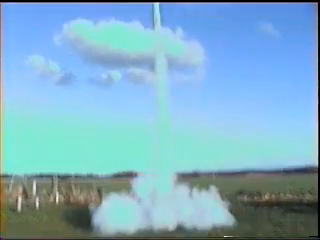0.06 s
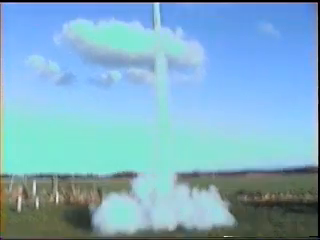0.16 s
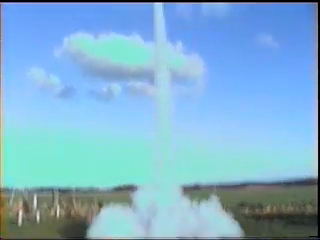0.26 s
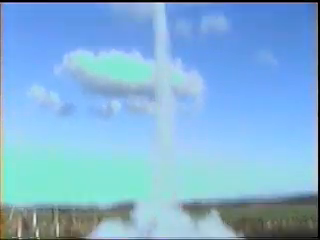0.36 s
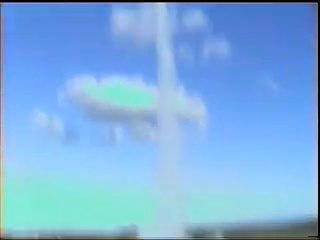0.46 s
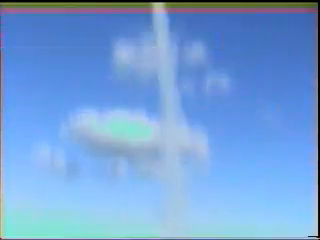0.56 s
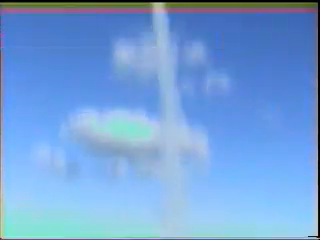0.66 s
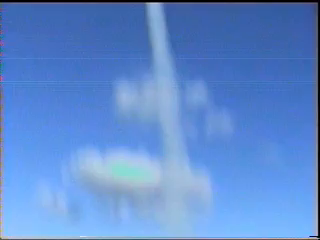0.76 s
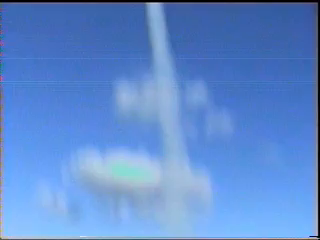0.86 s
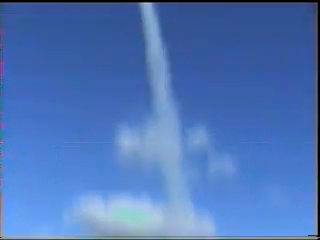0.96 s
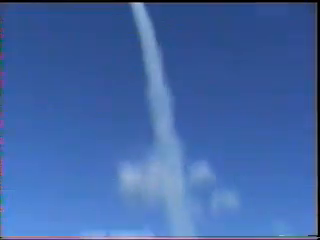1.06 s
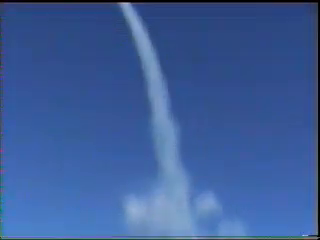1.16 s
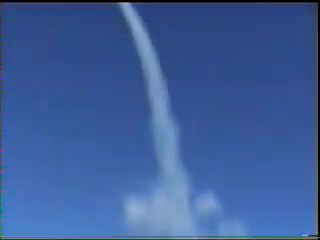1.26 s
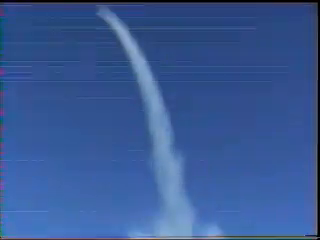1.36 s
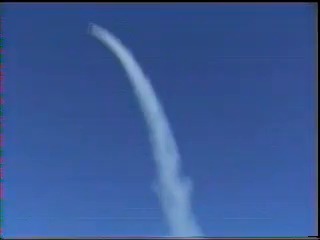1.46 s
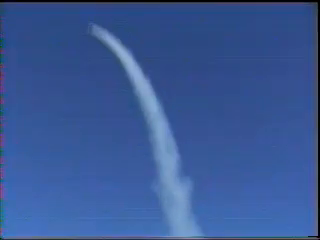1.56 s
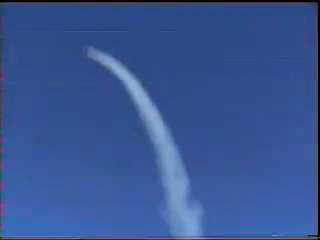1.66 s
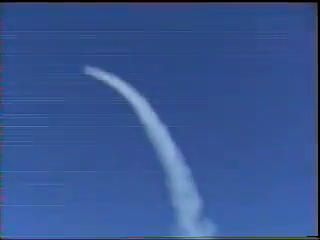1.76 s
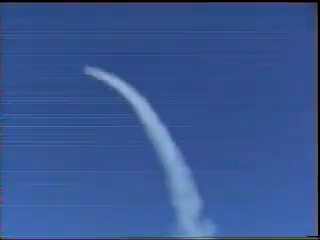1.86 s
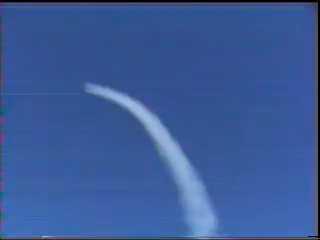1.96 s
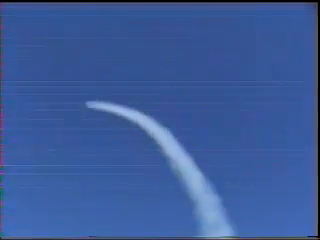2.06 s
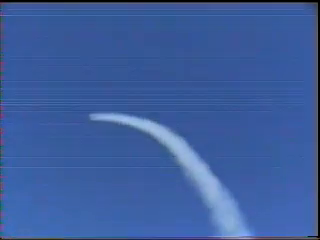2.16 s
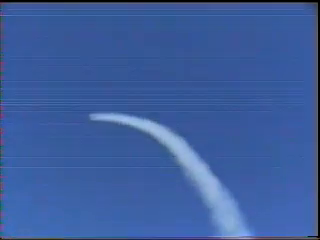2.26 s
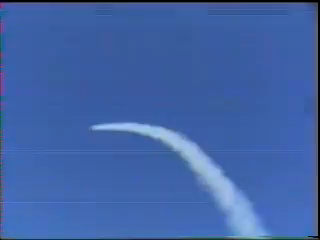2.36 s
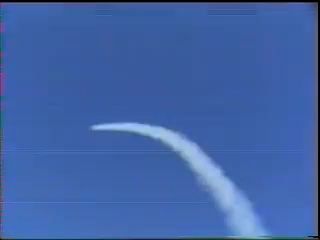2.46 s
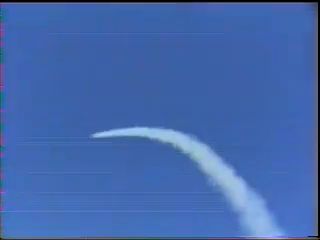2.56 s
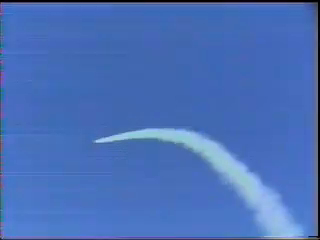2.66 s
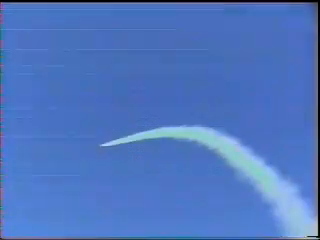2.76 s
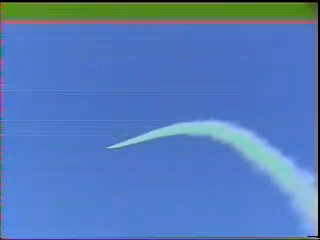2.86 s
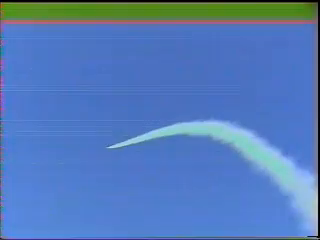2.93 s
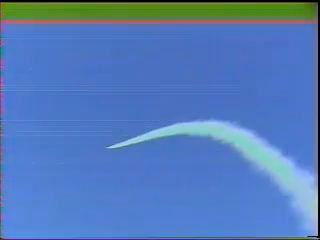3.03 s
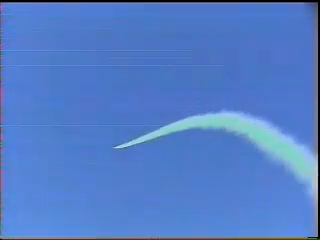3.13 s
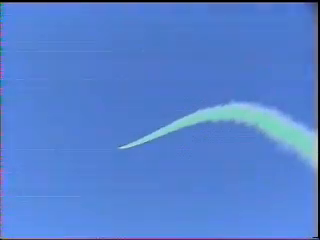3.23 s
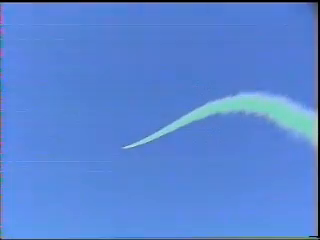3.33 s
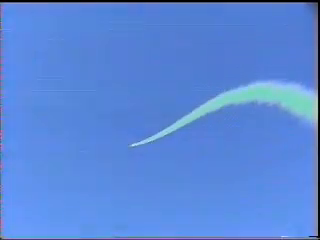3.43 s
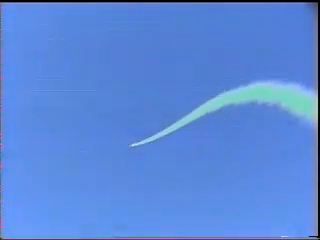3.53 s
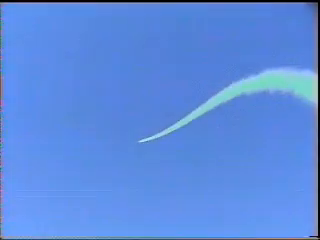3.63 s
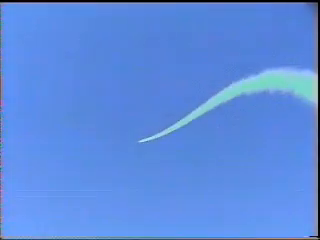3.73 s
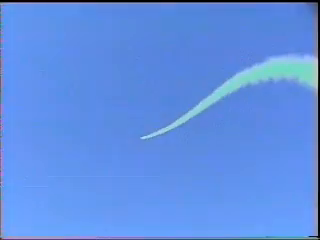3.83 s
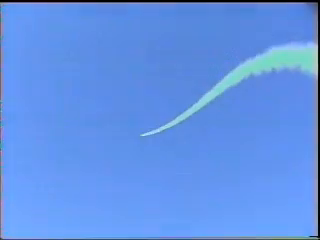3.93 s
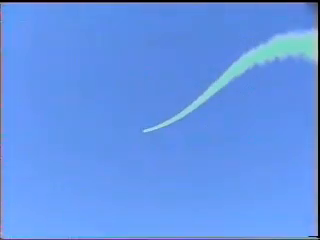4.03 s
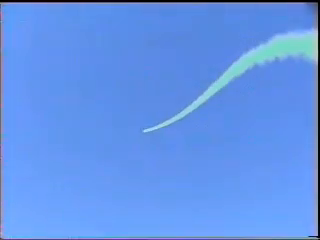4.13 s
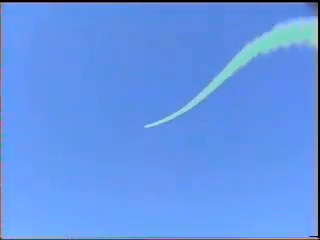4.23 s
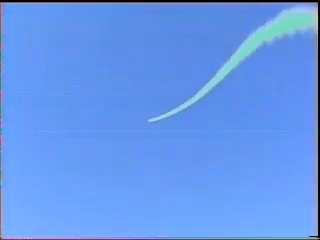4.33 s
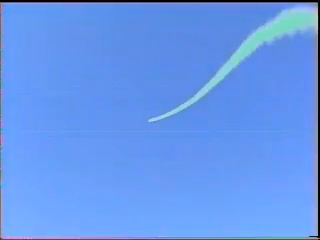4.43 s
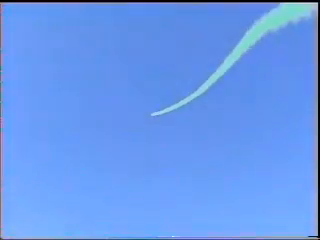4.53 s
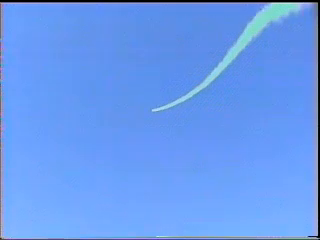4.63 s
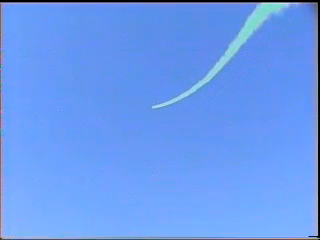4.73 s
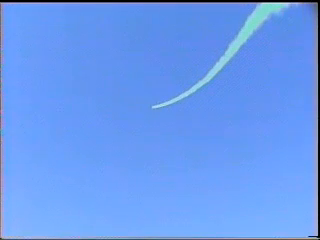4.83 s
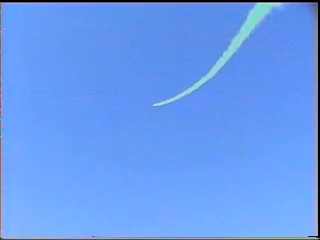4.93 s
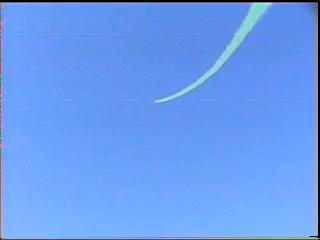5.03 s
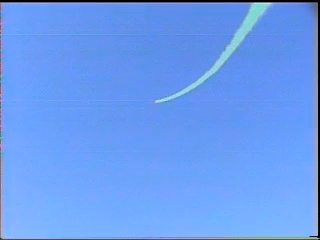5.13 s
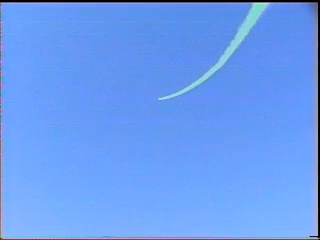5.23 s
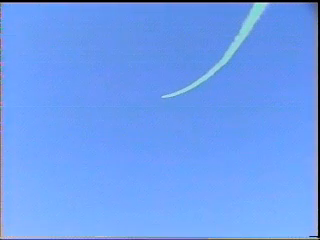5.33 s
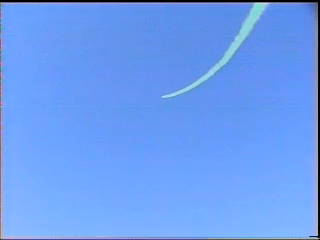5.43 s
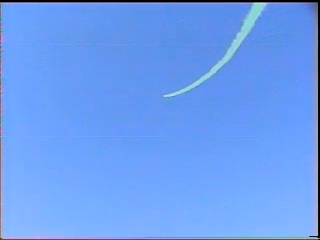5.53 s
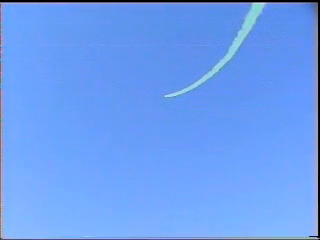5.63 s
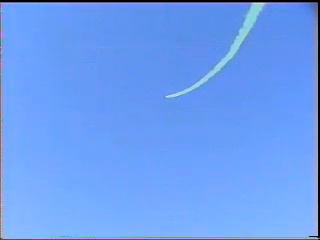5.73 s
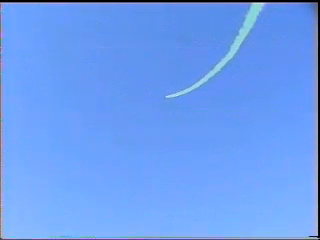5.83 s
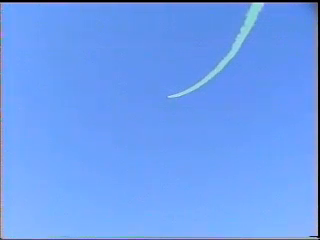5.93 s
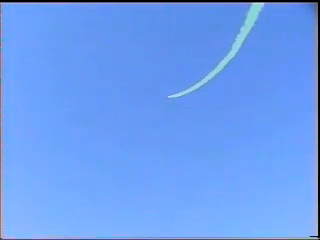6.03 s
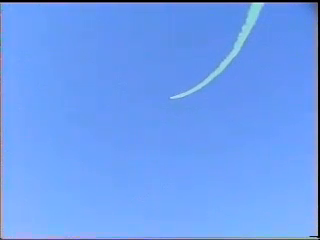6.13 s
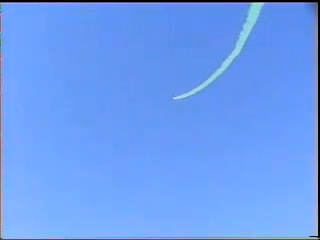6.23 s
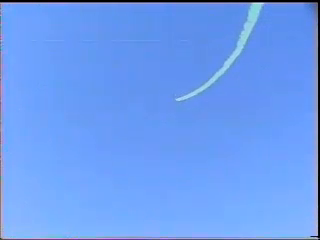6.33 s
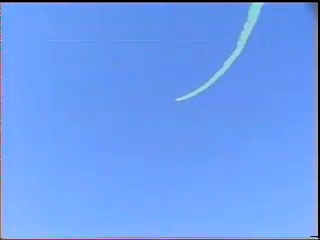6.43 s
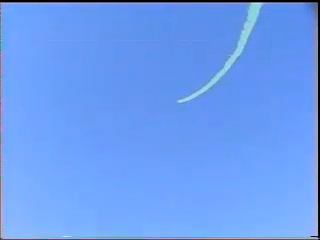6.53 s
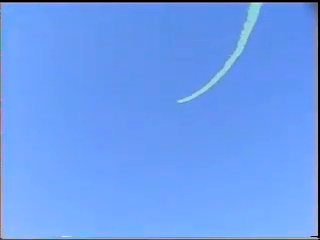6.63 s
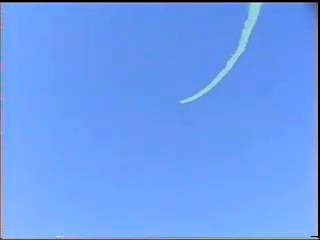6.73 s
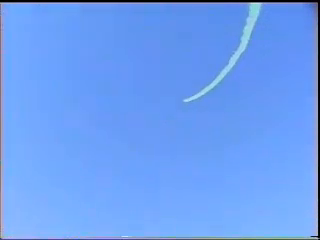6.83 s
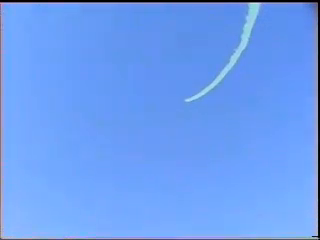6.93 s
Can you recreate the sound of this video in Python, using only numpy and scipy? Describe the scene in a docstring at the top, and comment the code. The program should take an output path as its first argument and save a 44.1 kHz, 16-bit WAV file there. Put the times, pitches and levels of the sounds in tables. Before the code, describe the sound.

Already at full force, a model rocket's jet roars over an open field, harsh and clipped, with surging low rumble beneath. It quickly eases into a steady, breathy rush that gets quieter and duller as the rocket climbs. A short, dull bang arrives from far off near the end, then the sound cuts dead. Gritty handheld camcorder sound, almost entirely in the left channel.

```python
"""An open field: a rocket motor's jet roars away, duller as it climbs, and ends in a dull far bang.
The jet is noise coloured by distance, the rumble is surging low noise, the bang a few pressure swings.
The grass and the hand-held camcorder's own body each return an echo to the microphone. The recorder
overloads, samples coarsely without smoothing and feeds the left channel; a faint copy leaks to the right."""
import sys
import numpy as np
from scipy import signal
from scipy.fft import rfft, irfft
from scipy.io import wavfile
from scipy.ndimage import uniform_filter1d, map_coordinates

SR = 44100
rng = np.random.default_rng(int(sys.argv[2]) if len(sys.argv) > 2 else 0)


def wav_record(signal):
    """Record a signal, one row per channel, as 16-bit PCM in the file named by sys.argv[1]."""
    frames = np.transpose(np.atleast_2d(signal))
    bounded = np.clip(frames, -1, 1)
    # unit amplitude maps onto the largest positive 16-bit level
    quanta = np.round(bounded * 32767).astype(np.int16)
    wavfile.write(sys.argv[1], SR, quanta)


N = 308011
T = np.arange(N) / SR  # s


def undb(db):
    """Amplitude factor of a level in dB."""
    return 10 ** (np.asarray(db) / 20)


def curves(table, t=T):
    """Columns of a (start_s, value, ..) table, read along straight lines at times t."""
    start_s, *columns = np.transpose(table)
    return [np.interp(t, start_s, column) for column in columns]


def colour(table, hz):
    """Level in dB of a (pitch_hz, level_db) table, read on a log-frequency axis."""
    pitch_hz, level_db = np.transpose(table)
    return np.interp(np.log(hz + 1), np.log(pitch_hz), level_db)


def butter(x, hz, kind="low", order=2):
    """Butterworth filter."""
    return signal.sosfilt(signal.butter(order, hz, kind, fs=SR, output="sos"), x)


def butter_in_phase(x, hz, kind="low", order=2):
    """Butterworth filter run forwards and backwards, so no frequency is delayed."""
    return signal.sosfiltfilt(signal.butter(order, hz, kind, fs=SR, output="sos"), x)


def delay(x, ms):
    """Sound that arrives later by a fixed or moving time, read between samples."""
    return map_coordinates(x, [np.arange(N) - ms * SR / 1000], order=3)


def patches(shape, wide, long):
    """Smooth random field over frequency and time, spread 1."""
    field = rng.standard_normal(shape)
    for _ in range(2):
        field = uniform_filter1d(field, wide, axis=0)
        field = uniform_filter1d(field, long, axis=1)
    return field / field.std()


def tone(hz, db):
    """Steady sine at a given rms level."""
    return np.sqrt(2) * undb(db) * np.sin(2 * np.pi * hz * T)


FLIGHT_S, DISTANCE_POWER = 6.4, 2.87


def distance(t=T):
    """Share of the flight's full distance; the rocket gains speed, so it grows as a power of time."""
    return (t / FLIGHT_S) ** DISTANCE_POWER


LIFTOFF_S = 0.52  # how fast the near-pad roar goes


def near_pad(t=T):
    """Nearness to the pad: 1 at the start, then a bell-shaped fall."""
    return np.exp(-(t / LIFTOFF_S) ** 2)


NOZZLE_HZ, NOZZLE_START_HZ, NOZZLE_TURN_S = 2450, 2070, 0.96  # settled pitch, first pitch, drift time
NOZZLE_WIDTH_HZ = 450
# How far the nozzle band stands out of the roar: start_s, lift_db
NOZZLE_LIFT = [(0, 2.5), (1, 3.5), (1.8, 2), (3, 6), (3.7, 2), (6.4, 5.5)]


def nozzle_band(hz, t):
    """Lift in dB of the jet's strong band, whose centre drifts upward early in the flight."""
    centre_hz = NOZZLE_HZ + (NOZZLE_START_HZ - NOZZLE_HZ) * np.exp(-t / NOZZLE_TURN_S)
    lift_db = curves(NOZZLE_LIFT, t)[0]
    return lift_db * np.exp(-((hz[:, None] - centre_hz) / NOZZLE_WIDTH_HZ) ** 2)


JET_DB, JET_FADE_DB = -18, 16.5  # base level; loss over the flight
LIFTOFF_DB, LIFTOFF_DB_PER_KHZ = 5, 1.5  # near the pad the roar is louder and brighter
TILT_DB_PER_KHZ, AIR_DB_PER_KHZ = 0.65, 10.5  # treble lift at no distance; air loss over the flight
JET_LOW_HZ = 99
# Relative colour of the jet through the microphone, per Hz of band: pitch_hz, level_db
JET = [(80, -15), (160, -12.5), (300, -7.5), (450, -4.5), (700, -4.5), (1000, -1), (1600, -1.5),
       (2300, -2.5), (2800, -3), (3200, -8.5), (3600, -15.5), (4500, -19.5), (5300, -27.5), (6200, -71)]


def jet(gust_db=0.51, eddy_db=0.36):
    """Turbulent noise; the air takes treble with distance and moving eddies make the bands waver."""
    hz, t, spectrum = signal.stft(rng.standard_normal(N), SR, nperseg=512, noverlap=384)
    tilt_db = TILT_DB_PER_KHZ - AIR_DB_PER_KHZ * distance(t) + LIFTOFF_DB_PER_KHZ * near_pad(t)
    db = colour(JET, hz)[:, None] + np.outer(hz / 1000, tilt_db)
    db = db + nozzle_band(hz, t)
    # equal power at every moment: loudness is set separately below
    gain = undb(db) / np.sqrt(np.mean(undb(2 * db), axis=0))
    gusts = patches(spectrum.shape, 40, 25)
    eddies = patches(spectrum.shape, 6, 12)
    gain = gain * undb(gust_db * gusts + eddy_db * eddies)
    roar = signal.istft(spectrum * gain, SR, nperseg=512, noverlap=384)[1][:N]
    level_db = JET_DB - JET_FADE_DB * distance() + LIFTOFF_DB * near_pad()
    return butter(roar, JET_LOW_HZ, "high", order=3) * undb(level_db)


RUMBLE_TOP_HZ, RUMBLE_SURGE_DB, RUMBLE_SURGE_S = 222, 2.2, .1
# Deep rumble of the plume, then low wind near the end, level around which it surges: start_s, level_db
RUMBLE = [(0, -23.5), (.6, -30), (1.8, -32.5), (3.2, -36), (4.2, -45.5), (5.2, -59.5), (5.8, -54.5),
          (6.3, -50)]


def rumble():
    """The big slow eddies of the plume come in surges, strongest while the rocket is near; low wind takes over
    at the end."""
    deep = butter(rng.standard_normal(N), RUMBLE_TOP_HZ, order=1)
    surge = patches((1, N), 1, int(RUMBLE_SURGE_S * SR))[0]
    level_db = curves(RUMBLE)[0] + RUMBLE_SURGE_DB * surge
    return deep / deep.std() * undb(level_db)


BANG_LOW_HZ = 97.6
BANG_TAIL_DB, BANG_TAIL_HZ, BANG_TAIL_S = -33.5, 900, 0.038  # scattered echoes of the bang
# Pressure swings of the far bang, before the microphone's bass loss:
# start_s (middle of the swing), pitch_hz, level_db (scale of the swing), length_cycles
BANG = [(6.3658, 650, -12, 0.23), (6.3720, 163, -9, 0.54), (6.3815, 404, -19.5, 0.73), (6.412, 256, -25, 1)]


def bang(glide=.7, late=.15):
    """Each swing is a slow dip in pressure followed by a quicker, higher rise; scattered echoes trail."""
    out = np.zeros(N)
    for start_s, pitch_hz, level_db, length_cycles in BANG:
        turn = pitch_hz * (T - start_s)
        swing = np.sin(2 * np.pi * turn * (1 + glide * np.clip(turn, -.5, 1)))
        out += undb(level_db) * swing * np.exp(-((turn - late) / length_cycles) ** 2)
    since = T - BANG[0][0]
    tail = butter(rng.standard_normal(N), BANG_TAIL_HZ)
    fade = (since > 0) * np.exp(-np.abs(since) / BANG_TAIL_S)
    out += undb(BANG_TAIL_DB) * tail / tail.std() * fade
    # the microphone passes little of its deepest part
    return butter_in_phase(out, BANG_LOW_HZ, "high")


GRASS_HZ = 800
# Bounce off the ground, relative to the direct sound before the grass dulls it: start_s, delay_ms, level_db
GROUND = [(0, 16, -23), (1.3, 23.6, -5.5), (2, 24.2, -25), (3.3, 24.4, -1.5), (4.2, 23, -6),
          (5.3, 23.2, -3), (6.4, 22.3, -3.8)]


def ground_echo(direct):
    """The grass returns a dull copy whose delay and strength move during the flight."""
    delay_ms, level_db = curves(GROUND)
    grass = butter_in_phase(direct, GRASS_HZ, order=1)
    return undb(level_db) * delay(grass, delay_ms)


BODY_MS, BODY_DB = 1.309, -15.5
BODY_FACING_DB, BODY_TURN_S, TILT_UP_POWER = -11.5, 1.15, 4  # weaker until the camcorder has tilted up


def body_echo(field):
    """The camcorder's body, close to the microphone, returns a short echo."""
    level_db = BODY_DB + BODY_FACING_DB * np.exp(-(T / BODY_TURN_S) ** TILT_UP_POWER)
    return undb(level_db) * delay(field, BODY_MS)


def scene():
    """Jet and bang with their bounces off grass and camcorder body, over the rumble; left channel only."""
    direct = jet() + bang()
    field = direct + ground_echo(direct)
    heard = field + body_echo(field) + rumble()
    return np.array([heard, np.zeros(N)])


CEILING, AMP_TOP_HZ = .2, 5540  # overload ceiling in full-scale units; filter ahead of the sampler


def overload(x):
    """The input stage flattens peaks; the filter after it keeps phases, so they stay flat."""
    return butter_in_phase(CEILING * np.tanh(x / CEILING), AMP_TOP_HZ, order=4)


SAMPLE_HZ = 12496.3


def staircase(x):
    """Sample slowly and repeat each value until the next: the spectrum mirrors around the sample rate."""
    step = np.floor(T * SAMPLE_HZ)
    return map_coordinates(x, [step * SR / SAMPLE_HZ], order=3)


LEAK_HZ = 2000  # below this the stray capacitance passes less
# Leak from the left wire to the right one, before that bass loss: pitch_hz, level_db
LEAK = [(100, -29.5), (1000, -37), (2700, -33.5), (4300, -32.5), (6200, -35.5), (8000, -34), (9700, -36.5),
        (12000, -38.5), (14800, -37)]


def leak(left):
    """Stray capacitance between the wires passes a faint copy, weaker in the bass."""
    hz = np.arange(N // 2 + 1) * SR / N
    passed = undb(colour(LEAK, hz)) * 1j * hz / (LEAK_HZ + 1j * hz)
    return irfft(rfft(left) * passed, N)


# Low flutter on the idle right wire: pitch_hz, level_db (rms)
FLUTTER = [(14.2, -71), (28.4, -82), (56.7, -88)]


def flutter():
    """A few steady low tones."""
    return sum(tone(pitch_hz, level_db) for pitch_hz, level_db in FLUTTER)


HISS_DB = -65  # rms, ahead of the sampler
WHINE_HZ, WHINE_DB = 4425, -67.5
TOP_HZ = 15740
STOP_S, STOP_FADE_S = 6.4297, .002  # silence from here on; length of the fade into it


def record(dry):
    """Overload, circuit hiss, coarse sampling, whine, leak to the right, stop and top cut."""
    hiss = undb(HISS_DB) * rng.standard_normal(N)
    left = staircase(overload(dry[0]) + hiss) + tone(WHINE_HZ, WHINE_DB)
    right = leak(left) + flutter()
    running = np.clip((STOP_S - T) / STOP_FADE_S, 0, 1)
    top = signal.ellip(14, .3, 70, TOP_HZ, fs=SR, output="sos")
    return signal.sosfilt(top, np.array([left, right]) * running)


dry = scene()
out = record(dry)
wav_record(out)
```